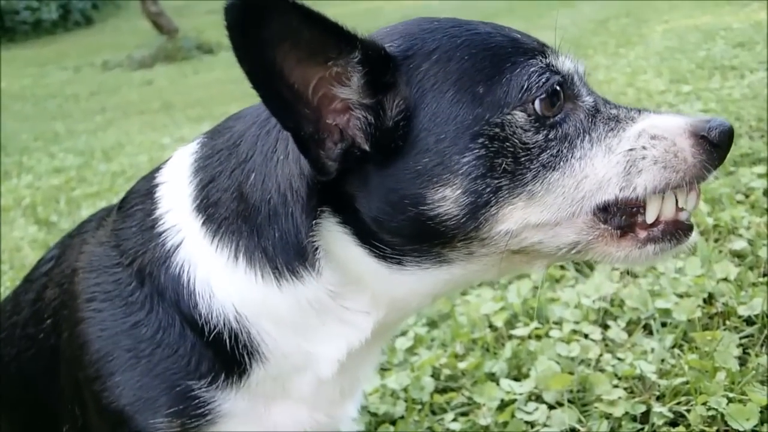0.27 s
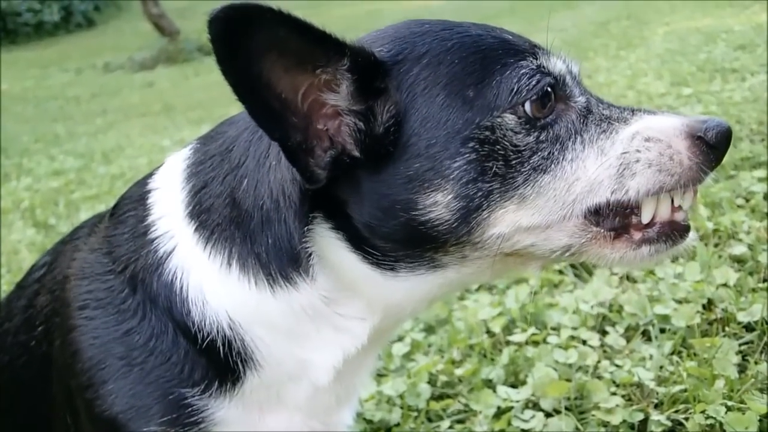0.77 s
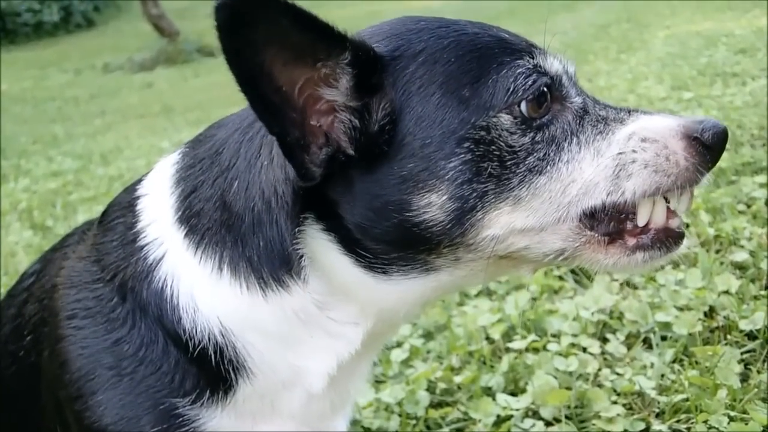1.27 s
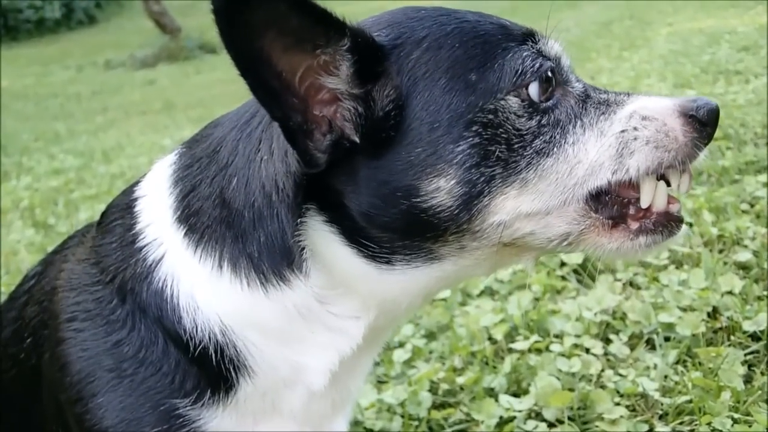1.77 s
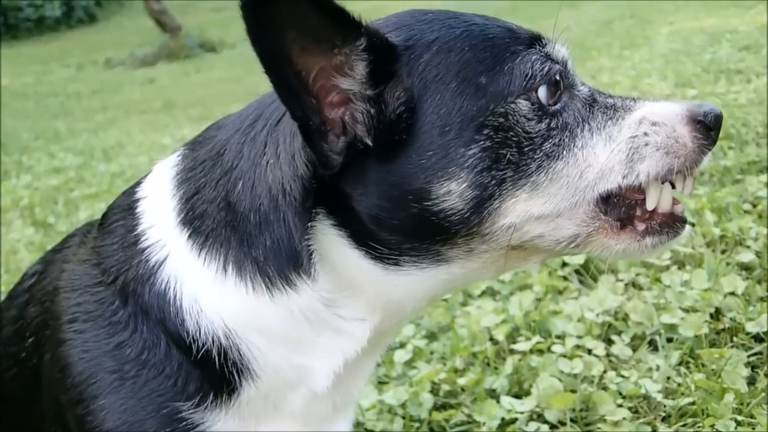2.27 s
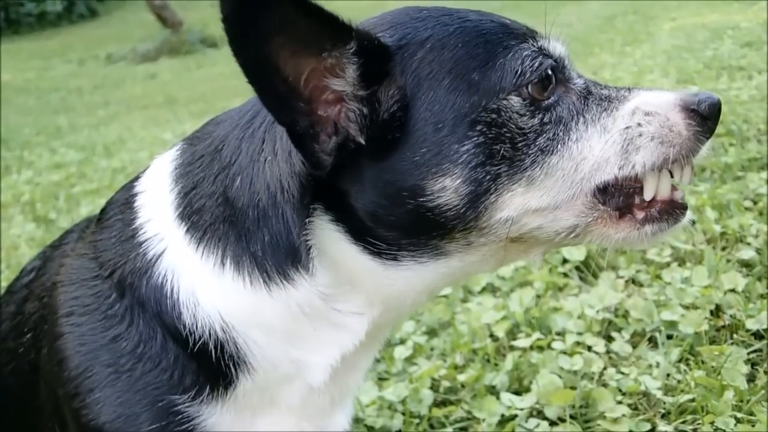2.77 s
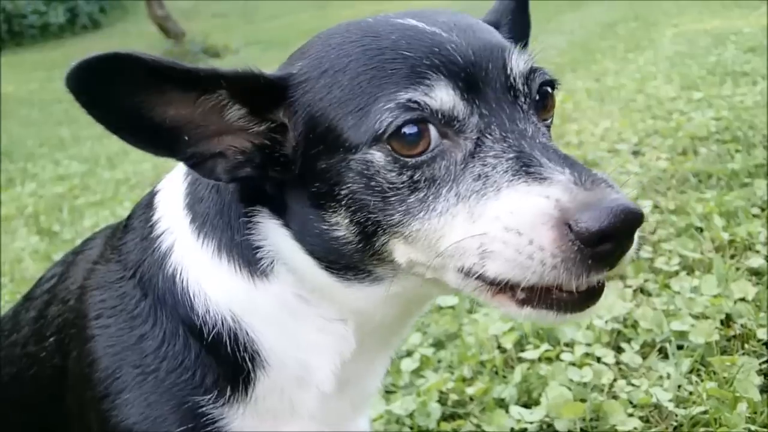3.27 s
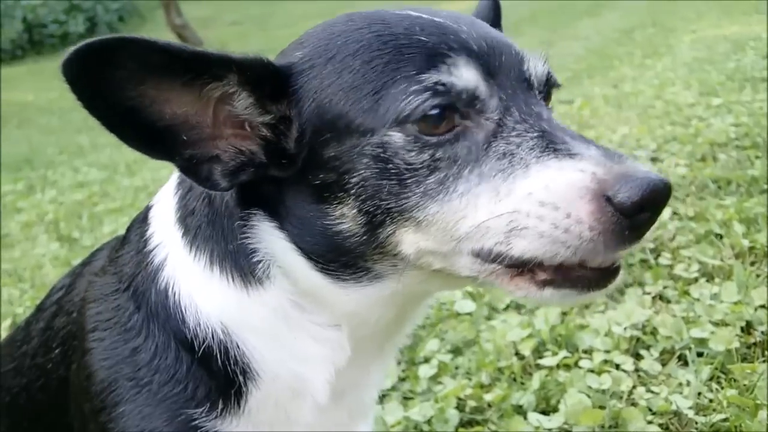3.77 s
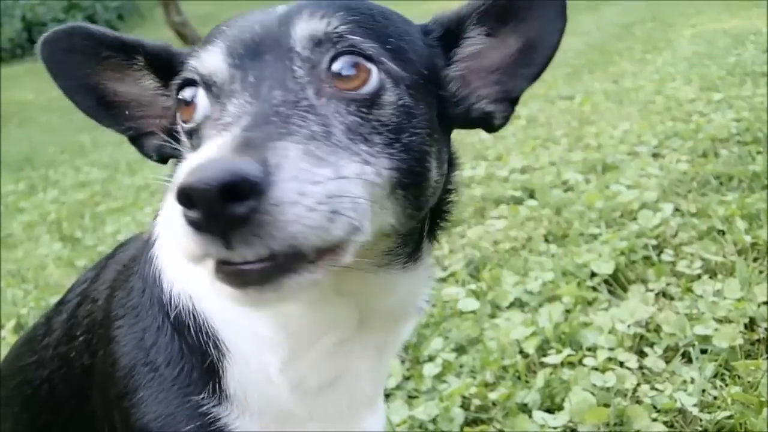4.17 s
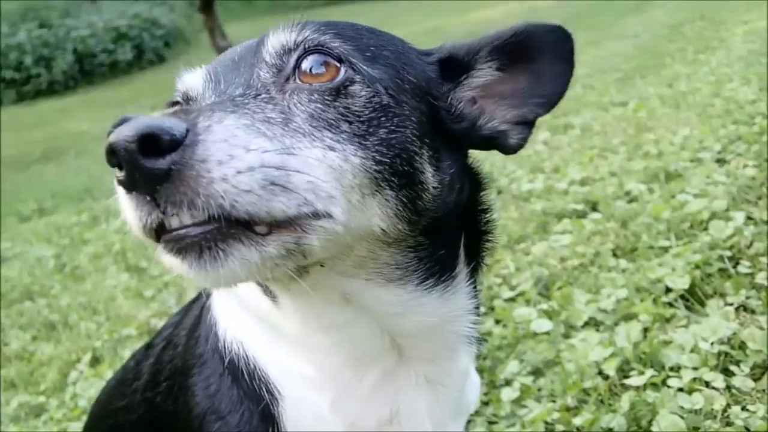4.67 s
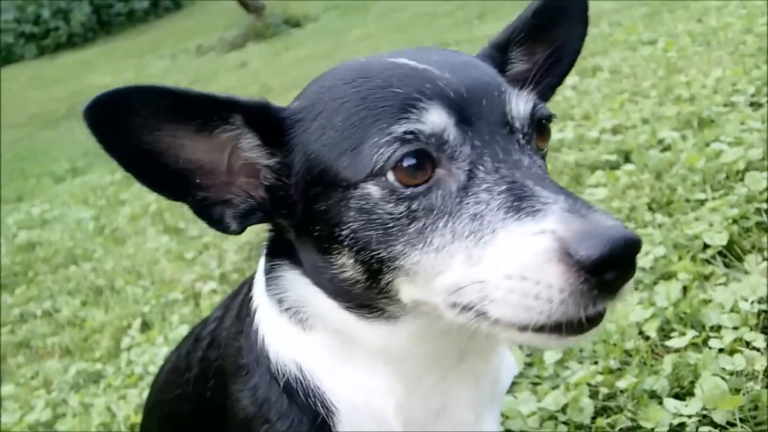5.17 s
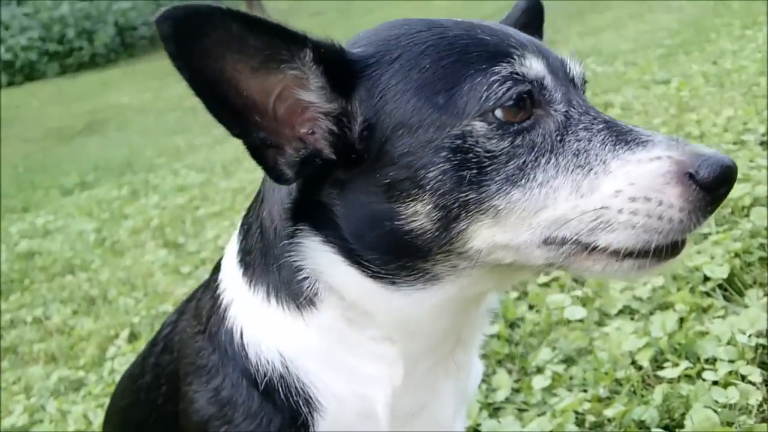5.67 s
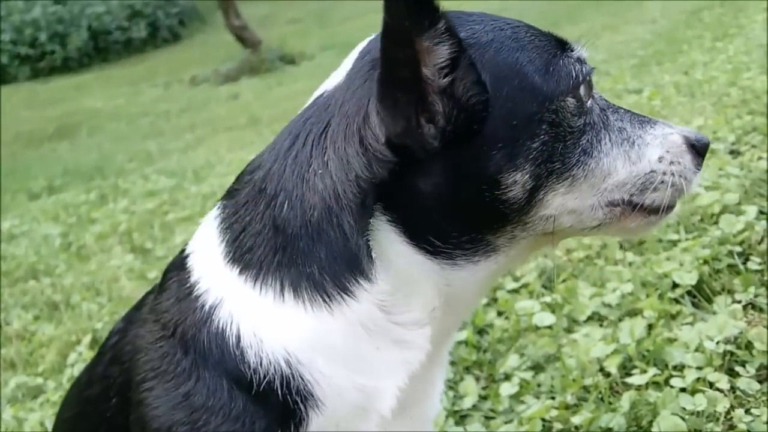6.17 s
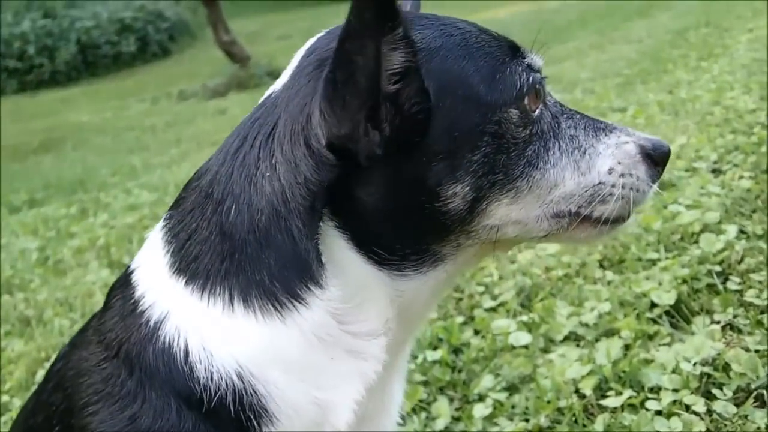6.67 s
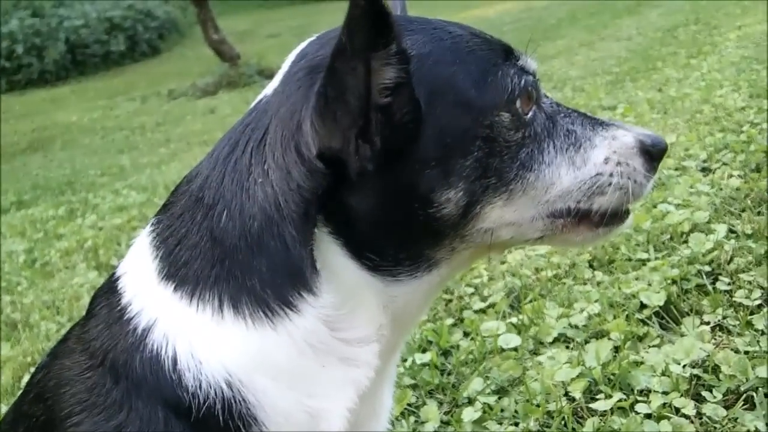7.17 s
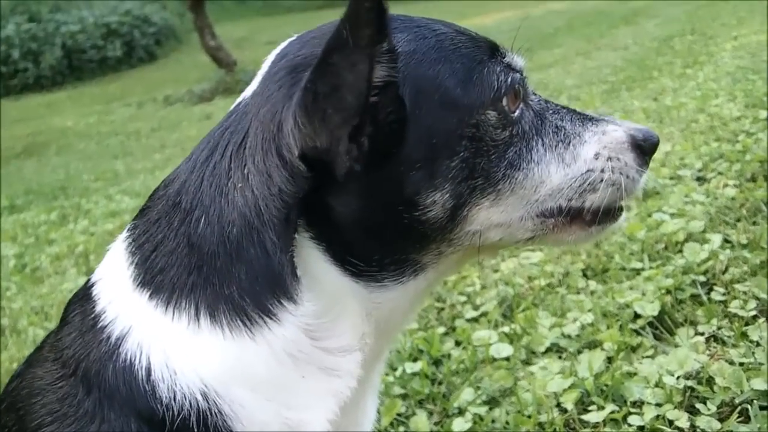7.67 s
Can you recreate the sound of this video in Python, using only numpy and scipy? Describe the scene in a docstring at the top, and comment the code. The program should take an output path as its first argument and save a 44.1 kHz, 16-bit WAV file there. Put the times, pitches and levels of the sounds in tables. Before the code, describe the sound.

A small dog snarls close by in three long, throaty growls, with wet lip clicks and faint metal jingles, while crickets chirp steadily over a lawn.

```python
"""Crickets chirp and trill over a lawn, and almost at once a small dog growls close by through bared teeth.
Two more long growls follow, the last lower with the lips nearly shut; short grunts lead into the first and third.
Slack vocal folds slap to make each growl: the slaps boom in the chest, ring the mouth and puff out rasping air.
Wet lip clicks, soft noise swells and rattling spit are shaped noise; small metal pieces jingle as bursts and modes.
Behind it all lie coloured-noise open air, a blended far chorus and a faint wavering hum."""
import sys
import numpy as np
from scipy import signal
from scipy.fft import rfft, irfft
from scipy.io import wavfile
from scipy.ndimage import uniform_filter1d

SR = 44100
rng = np.random.default_rng(int(sys.argv[2]) if len(sys.argv) > 2 else 0)


def file_out(sig):
    """Save sig as 16-bit WAV at sys.argv[1]."""
    # one column per channel
    cols = np.atleast_2d(sig).T
    # limit, then scale
    lim = np.clip(cols, -1, 1)
    pcm = np.round(lim * 32767).astype(np.int16)
    wavfile.write(sys.argv[1], SR, pcm)


N = 350154
TIME = np.arange(N) / SR

# colour of the open air: f/Hz, level/dB per Hz
LAWN = [(25, -45), (60, -5), (110, 4.5), (200, 1), (400, -3.5), (900, -7.5), (1800, -15), (3300, -16.5),
        (8500, -20), (10000, -21.5), (13000, -14.5), (16000, -27)]
# colour of the far cricket chorus: f/Hz, level/dB per Hz
CHORUS = [(3700, -19), (4300, -9.5), (4750, 4.5), (5050, -2), (5700, 2.5), (6080, -9.5), (6300, -9.5),
          (6950, -3.5), (7300, -8.5), (8000, -11), (9200, -29)]
# left-right likeness of air and chorus: f/Hz, likeness (1 alike, 0 unrelated, below 0 opposed)
SAME = [(50, 0.2), (130, 0.84), (300, 0.35), (1400, 0.2), (3100, 0.35), (4800, 0.41), (7000, 0.17),
        (10000, 0), (15000, -.3)]
# level of the cricket chorus: t/s, level/dB
CHORUS_DB = [(0, -42.5), (1.5, -45.5), (2.7, -42), (5.2, -42.5), (6.3, -44.5), (7.94, -42)]
# level of the faint hum: t/s, level/dB
HUM = [(5.4, -58.5), (5.9, -51.5), (6.6, -55.5)]
# bouts of the nearest trilling cricket: start t/s, end t/s, f/Hz, level/dB
TRILL = [(-.2, 2.18, 6880, -56.5), (2.45, 6.4, 7010, -52.5), (6.719, 8.2, 6970, -55)]
# trilling crickets farther off: f/Hz, strokes/s, level/dB, left minus right/dB
FAR_TRILLS = [(5550, 51, -60.5, -13), (6230, 38, -60.5, -13.5), (6640, 44, -63.5, -18), (4980, 80, -61, 1)]
# metal clinks: t/s, chatter length/s, peak level/dB, ring level/dB before the ring trim, scrape length/s
CLINKS = [(3.745, .003, -28.5, 10, 0.021), (3.822, .003, -23.5, -8, 0.0036), (4.164, .003, -25, 4, 0.01),
          (4.223, .031, -17, 3, .0025), (4.6, .017, -19, -9, 0.0021), (4.973, .003, -29.5, 13.5, .017),
          (5.063, .003, -23.5, -3, 0.0021), (5.155, .003, -31, 2, 0.009), (6.228, .003, -32, -1, .025),
          (6.319, .003, -28, -4, 0.0084), (6.57, .003, -30, -3, 0.042), (6.979, .003, -33, 3, .02),
          (7.703, .003, -30, 8, 0.0061), (7.74, .024, -16.5, -6, 0.0026)]
# modes of the ringing metal: f/Hz, relative level/dB, time to fall 60 dB/s
METAL = [(3210, -13, .08), (4610, -8, .05), (6280, -2, .07), (6720, -6, .06), (12250, -6, .17),
         (12440, -9, .2), (12800, -12, .1), (13720, -11, .15), (14620, -5, .08), (14750, 2, .1)]
# colour of the metal's first burst: f/Hz, level/dB
STRIKE = [(1500, -66), (2600, -10), (3200, -7.5), (4700, 12.5), (6500, 6), (8000, -3), (10500, -5),
          (12500, 8), (15000, -52), (17000, -68)]
# soft swells of noise, short ones (perhaps the dog sniffing) and long faint high hiss:
# t/s, length/s, level/dB, centre f/Hz
NOISE_SWELLS = [(2.065, 0.13, -55.5, 1480), (2.55, 0.6, -55, 11000), (3.095, 3, -53.5, 14100),
                (3.981, 0.05, -51, 2077), (4.371, 0.069, -47.5, 2230), (4.382, 0.31, -53, 780),
                (4.412, 0.28, -51.5, 2640), (4.778, 0.075, -53.5, 2000), (6.355, .05, -57, 2200)]
# wet clicks of lips and tongue: t/s, peak level/dB before the smack trim, centre f/Hz
SMACKS = [(.129, -15.5, 4600), (.135, -17, 4780), (.141, -17, 4800), (.168, -18, 4630), (.232, -27, 2960),
          (1.353, -16.5, 4860), (2.326, -26.5, 3007), (2.345, -30.5, 2900), (3.853, -13, 5260),
          (4.601, -25.5, 3500), (4.744, -17.5, 5000), (4.745, -25.5, 2500), (6.578, -22.5, 4800),
          (7.107, -32, 3160)]
# bouts of spit rattling in the throat: start t/s, end t/s, flaps/s, level/dB before trim and fade
RATTLES = [(0.282, .68, 20.9, -33), (2.791, 3.0, 21.6, -35.5)]
# the three long growls: t/s, pitch f/Hz, chest level/dB, mouth level/dB (levels before each growl's trim)
SNARL = [(0.099, 107.2, -24.5, -34.5), (0.139, 103.5, -23.5, -29), (0.243, 111.5, -25.5, -35.5),
         (0.309, 96.96, -24, -34), (0.449, 112.0, -25.5, -38.5), (0.507, 103.1, -24, -38.5),
         (0.729, 112, -28.5, -43.5), (1.257, 101.3, -29, -43), (1.551, 112.2, -26.5, -40),
         (1.623, 96.7, -28, -42), (1.685, 104.5, -28, -42), (1.955, 98.6, -28.5, -44.5)]
GROWL = [(2.696, 100.2, -28.5, -37), (2.748, 103, -27.5, -36), (2.946, 102.9, -28, -39),
         (2.986, 110, -30.5, -40.5), (3.132, 112.1, -28.5, -38.5), (3.27, 104, -30, -39.5),
         (3.592, 104.8, -32, -41), (3.738, 95.9, -32.5, -40.5), (3.885, 95.7, -32, -39.5)]
GRUMBLE = [(6.445, 76.7, -44, -69), (6.553, 82.7, -32.5, -59), (6.643, 73.24, -38, -62),
           (6.733, 83.6, -34.5, -63), (6.823, 83.2, -35, -56), (6.885, 86.54, -33, -51.5),
           (7.281, 88.85, -32, -49.5), (7.563, 85.44, -33.5, -55), (7.85, 78.6, -36, -58.5)]
# short grunts: t/s, length/s, pitch f/Hz, chest level/dB, mouth level/dB
GRUNTS = [(0.069, 0.0227, 104.8, -24.5, -29), (6.092, 0.042, 81.5, -42, -72),
          (6.142, .085, 79.2, -36.5, -62)]
# spells in which the folds lock into a clean beat: t/s, half length/s
CLEAN_SPELLS = [(1.033, 0.062), (1.432, 0.064), (3.191, 0.054), (3.69, .12), (6.578, 0.052), (7.548, .15)]
# the lips: t/s, how far drawn back (0-1)
BARED = [(.05, 0.71), (.6, 0.94), (1.05, 0.46), (2.7, 0.52), (2.82, 0.82), (3.04, 0.16), (7.9, 0.14)]
# boom of the chest with jaws open, ajar and shut: f/Hz, level/dB
CHEST_OPEN = [(50, -40), (85, -24.5), (115, -9.5), (170, -2), (220, 0.5), (290, -9.5), (365, -12),
              (430, -18), (500, -54.5), (700, -29), (1400, -53), (8000, -100)]
CHEST_AJAR = [(50, -20), (85, -22), (115, -1), (170, -1.5), (215, 5), (290, -4), (400, -10.5), (500, -10.5),
              (640, -35), (1400, -54), (8000, -100)]
CHEST_SHUT = [(50, -59), (85, -18.5), (125, -5), (175, -2), (260, -6.5), (355, -8.5), (440, -26),
              (530, -23), (650, -36.5), (1400, -61), (8000, -100)]
# ring of the mouth, before its size and the tongue shift it: f/Hz, level/dB
MOUTH = [(300, -47), (520, -24.5), (620, -12.5), (730, -8.5), (830, -2), (905, 4), (1030, -5.5),
         (1190, -6.5), (1350, -40.5), (1520, -19), (1750, -46), (3500, -40), (10000, -82)]
# rasp of air with lips down, teeth just showing, and lips wide back: f/Hz, level/dB
RASP_LIPS = [(900, -26), (1430, 6.5), (1750, 1), (2150, 15), (2550, 9.5), (2950, -1.5), (3500, -2),
             (5000, -2), (8000, -7.5), (16000, -6.5)]
RASP_TEETH = [(900, -26.5), (1520, 3), (1800, 0.5), (2100, -1), (2500, 6), (2950, -1), (3600, 5), (4400, 8),
              (4900, 14), (5500, 14), (6100, -6), (9000, -5), (10200, -38), (16000, -53)]
RASP_WIDE = [(900, -15), (1550, -41.5), (1850, 5.5), (2150, 6), (2450, -2), (2800, 11.5), (3150, 6),
             (3450, -5), (3750, 6.5), (4400, -5), (4900, 17), (5400, 9), (6100, 15), (7100, -12),
             (9400, 2.5), (10300, -26), (16000, -25)]

LAWN_DB, HUM_HZ = -48.5, 131.8
CHIRP_FIRST_S, CHIRP_EVERY_S = .275, .458  # a field cricket keeps a nearly even beat
CHIRP_DB = -36.5  # the full-height strokes, before their random unevenness
BOUNCE_S = .0068  # time between knocks while the metal pieces chatter
ATTACK_S = 0.0036  # fade at both ends of every growl and grunt
RELEASE_S, RELEASE_DB, RELEASE_SAG = 0.0785, -29.5, .26  # air runs out: level falls, pitch sags by this share
FUNDAMENTAL_HZ, FUNDAMENTAL_DB_PER_OCTAVE = 109, 36  # below this pitch the fundamental fades quickly
BUILD_DB, BUILD_S = -10, 0.21  # the fundamental starts this much weaker and builds up
PUSH_DB, PUSH_S = 2.5, 0.022  # the first slaps burst out harder
RASP_SHARE = 0.51  # dB of rasp for each dB of the mouth
FLUTTER_FROM, FLUTTER_RANGE = .27, .35  # onset and span of throat flutter, in roughness times bared lips
EDGE_HZ = 15850  # upper band limit


def amp(db):
    """Decibels to gain."""
    return 10 ** (np.asarray(db) / 20)


def evened(x):
    """Scales to rms 1."""
    return x / np.sqrt(np.mean(x ** 2) + 1e-20)


def read(points, hz):
    """Reads a spectrum on a log-frequency axis."""
    f, value = np.transpose(points)
    return np.interp(np.log(hz + 1), np.log(f + 1), value)


def follow(rows, t):
    """Reads every column of a curve at the times t."""
    s, *columns = np.transpose(rows)
    return [np.interp(t, s, c) for c in columns]


def add(mix, s, sound):
    """Mixes a sound in at time s."""
    part = mix[max(round(s * SR), 0):][:len(sound)]
    part += sound[:len(part)]


def wander(n, hz):
    """Slow random drift, moving up to about hz times a second; rms 1 over its full eight-second run."""
    count, rate = 2 ** 14, 2000
    f = np.fft.rfftfreq(count, 1 / rate)
    slow = evened(irfft(rfft(rng.standard_normal(count)) / (1 + (f / hz) ** 4)))
    return np.interp(np.arange(n) / SR, np.arange(count) / rate, slow)


def colour(x, points):
    """A causal filter with the given spectrum: each pulse rings after it lands."""
    log_gain = np.log(amp(read(points, abs(np.fft.fftfreq(4096, 1 / SR)))))
    taps = np.fft.ifft(np.exp(np.conj(signal.hilbert(log_gain)))).real  # minimum phase
    return signal.oaconvolve(x, taps[:len(taps) // 2])[:len(x)]


def band(x, hz, ratio):
    """A gentle band-pass from hz / ratio to hz * ratio."""
    ratio = max(ratio, 1.05)
    edges = [hz / ratio, min(hz * ratio, SR / 2 - 1)]
    return signal.sosfilt(signal.butter(2, edges, "band", fs=SR, output="sos"), x)


def steadied(x, size=4000):
    """Keeps the slow level near rms 1 and leaves single pulses uneven."""
    return x / np.sqrt(abs(uniform_filter1d(x ** 2, size)) + 1e-4 * np.mean(x ** 2))


def place(x, pan_db):
    """Sets a sound between left and right; pan_db is left minus right."""
    return x * amp([[pan_db / 2], [-pan_db / 2]])


def wash(spectrum, patchy_db):
    """Distant sound from all sides, in drifting patches, partly alike in both channels."""
    hz = np.fft.rfftfreq(1024, 1 / SR)
    frames = N // 256 + 5
    a, b, c, d, patches = rng.standard_normal((frames, len(hz), 5)).T
    patches = uniform_filter1d(patches, size=6, axis=0)
    patches = evened(uniform_filter1d(patches, size=5, axis=1))
    same = np.clip(read(SAME, hz), -1, 1)[:, None]
    left = a + 1j * b
    right = same * left + np.sqrt(1 - same ** 2) * (c + 1j * d)
    z = np.array([left, right]) * amp(read(spectrum, hz)[:, None] + patchy_db * patches)
    return evened(signal.istft(z, nperseg=1024, noverlap=768)[1][:, :N])


def hum():
    """A faint sine that wavers in pitch and strength."""
    pitch = HUM_HZ * (1 + .015 * wander(N, 9.6))
    tone = np.sin(2 * np.pi * np.cumsum(pitch) / SR)
    return evened(tone * amp(1.9 * wander(N, 6))) * amp(follow(HUM, TIME)[0])


def background():
    """Open air, the blended chorus of far crickets, and the hum, all leaning right."""
    air = wash(LAWN, patchy_db=3.0) * amp(LAWN_DB)
    chorus = wash(CHORUS, patchy_db=2.5) * amp(follow(CHORUS_DB, TIME)[0])
    return place(air + chorus + hum(), -4.0)


def stroke_train(hz, rate, glide=.045, duty=.62, blur=0.01293):
    """A trilling cricket's wings: every stroke is a short tone that sags in pitch."""
    phase = np.cumsum(rate * (1 + .008 * wander(N, 2))) / SR % 1 / duty
    pitch = hz * (1 + glide * (.5 - phase) + blur * wander(N, 309.4))
    stroke = np.sin(np.pi * np.minimum(phase, 1))  # silent between strokes
    tone = np.sin(2 * np.pi * np.cumsum(pitch) / SR)
    return evened(stroke * tone * amp(0.77 * wander(N, 5.8)))


def chirping_cricket(stroke_s=.024, gap_s=.043, chirp_hz=4810, sag=0.044, uneven_s=.004, count=4):
    """Wing strokes in groups: the first strokes of each chirp swell, and each stroke sags in pitch."""
    chirps, u = np.zeros(N), np.linspace(0, 1, int(stroke_s * SR))
    for s in np.arange(CHIRP_FIRST_S, N / SR, CHIRP_EVERY_S):
        start = s + uneven_s * rng.standard_normal()
        for k in range(count):
            pitch = chirp_hz * (1 + sag * (.5 - u) + 0.013 * rng.standard_normal())
            swell_db = -3 * max(2 - k, 0) + rng.standard_normal()
            stroke = np.sin(np.pi * u) * np.sin(2 * np.pi * np.cumsum(pitch) / SR)
            add(chirps, start + k * gap_s - stroke_s / 2, amp(CHIRP_DB + swell_db) * stroke)
    return chirps


def crickets(swell_s=0.15):
    """One cricket chirps in groups of strokes; others trill, the nearest in long bouts."""
    out = place(chirping_cricket(), 1)
    for start, end, hz, db in TRILL:
        bout = np.clip(np.minimum(TIME - start, end - TIME) / swell_s, 0, 1)
        out += place(stroke_train(hz, 41.4) * bout * amp(db), -2.5)
    for hz, rate, db, pan_db in FAR_TRILLS:
        out += place(stroke_train(hz, rate, blur=0.018) * amp(db), pan_db)
    return out


def metal_ring(t, detune=0.0031):
    """Thin high modes of small metal, each a little off in pitch and level, dying at its own pace."""
    modes = np.zeros(len(t))
    for hz, level, t60 in METAL:
        decay = amp(level + rng.standard_normal() - 60 * t / t60)
        turns = hz * (1 + detune * rng.standard_normal()) * t
        modes += decay * np.sin(2 * np.pi * (turns + rng.random()))
    return modes


def jingle(ring_trim_db=-14, uneven_db=1.5):
    """Metal pieces knock, chatter or slide: a burst, then a ring, unlike at each microphone port."""
    out, t = np.zeros((2, N)), np.arange(SR // 4) / SR
    for start, length, db, ring_db, scrape_s in CLINKS:
        rise = 1 - np.exp(-2 * t / scrape_s)
        for s in np.arange(start, start + length, BOUNCE_S):
            force = amp(db + uneven_db * rng.standard_normal())
            for side in out:
                scrape = rng.standard_normal(len(t)) * rise * np.exp(-t / scrape_s)
                strike = colour(scrape, STRIKE)
                ring = amp(ring_db + ring_trim_db) * rise * metal_ring(t)
                add(side, s, force * (strike / abs(strike).max() + ring))
    return place(out, -4.0)


def yard(x, t60, low_hz=700):
    """Faint scatter of the treble from leaves and things nearby, different in each channel."""
    t = np.arange(SR // 3) / SR
    echoes = rng.standard_normal((2, len(t))) * (rng.random((2, len(t))) < .05)  # sparse reflections
    taps = echoes * amp(-60 * t / t60) * (t > .003)
    taps = signal.lfilter(*signal.butter(1, low_hz, "high", fs=SR), taps / np.linalg.norm(taps[0]))
    return signal.oaconvolve(np.atleast_2d(x) * np.ones((2, 1)), taps, axes=1)[:, :N]


def noise_swells():
    """Band-passed noise rises and falls softly: short swells, and long faint high hiss."""
    out = np.zeros(N)
    for s, length, db, hz in NOISE_SWELLS:
        n = int(length * SR)
        swell = np.sin(np.linspace(0, np.pi, n))
        add(out, s, amp(db) * evened(band(rng.standard_normal(n), hz, 1.54) * swell))
    return out


def smacks(smack_s=0.0032, trim_db=-1):
    """Wet clicks of lips and tongue: a tiny noise burst with a bright band and a softer low one."""
    out, t = np.zeros(N), np.arange(SR // 30) / SR
    decay = np.exp(-t / smack_s)
    for s, db, hz in SMACKS:
        click = band(rng.standard_normal(len(t)) * decay, hz, 1.2)
        click += .5 * band(rng.standard_normal(len(t)) * decay, 630, 1.85)
        add(out, s, amp(db + trim_db) * click / abs(click).max())
    return out


def rattles(length_s=0.03, centre_hz=3100, spread=0.0575, fall=0.176, width_hz=350, trim_db=-9,
            fade_db_per_s=-20):
    """Each flap of the wet throat is a short fuzzy squelch that falls in pitch; a bout dies away."""
    out, u = np.zeros(N), np.linspace(0, 1, int(length_s * SR))
    for start, end, rate, db in RATTLES:
        for s in np.arange(start, end, 1 / rate):
            hz = centre_hz * (1 + spread * rng.standard_normal())
            tone = np.exp(2j * np.pi * np.cumsum(hz * (1 + fall * (.5 - u))) / SR)
            fuzz = wander(len(u), width_hz) + 1j * wander(len(u), width_hz)
            squelch = evened((tone * fuzz).real * np.sin(np.pi * u))
            level_db = db + trim_db + fade_db_per_s * (s - start)
            add(out, s - length_s / 3, amp(level_db) * squelch)
    return out


def roughness(t, first, last, settle_s, clean=.65):
    """A growl starts ragged and settles, with brief clean spells on the way."""
    rough = last + (first - last) / (1 + ((t - t[0]) / settle_s) ** 4)
    for s, half_s in CLEAN_SPELLS:
        rough = rough * (1 - clean * np.exp(-((t - s) / half_s) ** 2))
    return np.clip(rough, 0, 1)


def throat_flap(t, rough, lips):
    """Loose tissue in the throat flaps slowly, loosely in step with the nearest rattle of spit."""
    depth = np.clip((rough * lips - FLUTTER_FROM) / FLUTTER_RANGE, 0, 1)
    flap_s, _, flap_hz, _ = min(RATTLES, key=lambda bout: abs(bout[0] - t[0]))
    return depth * np.cos(2 * np.pi * flap_hz * (t - flap_s) + .5 * wander(len(t), 7.7))


def fold_slaps(hz, rough, flap, jitter=.19, drift=.06, shimmer_db=3, burst_db=5, flutter_db=4,
               chest_flutter_db=1.5):
    """Slack vocal folds slap unevenly: one pulse train for the chest, a harsher one for mouth and air."""
    n = len(hz)
    turns = np.cumsum(hz * (1 + drift * rough * wander(n, 25))) / SR
    beats = np.searchsorted(turns, np.arange(np.ceil(turns[-1])))
    late, strong, harsh, luck = rng.standard_normal((400, 4))[:len(beats)].T
    # most slaps keep time; now and then one slips, and lands harder
    slip = np.where(abs(luck) < rough[beats], rough[beats] ** .5, .23 * rough[beats])
    at = np.clip(beats + jitter * slip * late * SR / hz[beats], 0, n - 1).astype(int)
    slaps, snaps = np.zeros((2, n))
    slaps[at] = amp(shimmer_db * rough[at] * strong + chest_flutter_db * flap[at])
    snaps[at] = amp(burst_db * slip * np.minimum(abs(harsh), 2) + flutter_db * flap[at])
    return slaps, snaps


def air_puffs(snaps, hz, puff_turns=0.3, leak=0.21):
    """Each slap lets out a dying puff of noisy air, over a steady leak."""
    decay = np.exp(-hz.mean() / (puff_turns * SR))
    puffs = signal.lfilter([1], [1, -decay], np.sqrt(snaps)) + leak
    return evened(puffs * rng.standard_normal(len(snaps)))


def chest_boom(slaps, lips, chest_colour):
    """The slaps boom in the chest; the jaws part as the lips draw back, which opens the sound."""
    jaws = np.minimum(2 * lips, 1)
    return steadied(jaws * colour(slaps, CHEST_OPEN) + (1 - jaws) * colour(slaps, chest_colour))


def mouth_ring(drive, rough, mouth_size):
    """The tongue shifts, so the mouth rings now a little lower, now a little higher."""
    tongue = .5 + .5 * np.tanh(8.6 * rough * wander(len(drive), 7.6))
    low = colour(drive, [(f * .97 / mouth_size, db) for f, db in MOUTH])
    high = colour(drive, [(f * 1.03 / mouth_size, db) for f, db in MOUTH])
    return steadied((1 - tongue) * low + tongue * high)


def rasp(air, snaps, lips, buzz=0.47):
    """Air hisses past lips and teeth, its colour blending as the lips draw back."""
    jet = air + buzz * (1 - lips) * evened(snaps)
    hiss = np.zeros(len(jet))
    for k, shape in enumerate((RASP_LIPS, RASP_TEETH, RASP_WIDE)):
        hiss += np.maximum(1 - abs(2 * lips - k), 0) * colour(jet, shape)
    # hold the level around 2.5 kHz steady
    power = uniform_filter1d(band(hiss, 2520, 1.375) ** 2, size=5000)
    return hiss / np.sqrt(abs(power) + 1e-12)


def growl(t, hz, chest_db, mouth_db, rasp_db, fundamental_db, rough, chest_colour, mouth_size, breathy=0.99):
    """Uneven fold slaps boom in the chest, ring the mouth and let out rasping puffs of air."""
    lips = np.clip(follow(BARED, t)[0], 0, 1)
    slaps, snaps = fold_slaps(hz, rough, throat_flap(t, rough, lips))
    air = air_puffs(snaps, hz)
    boom = chest_boom(slaps, lips, chest_colour)
    lowpass = signal.butter(4, 1.6 * hz.mean(), fs=SR, output="sos")
    fundamental = steadied(signal.sosfiltfilt(lowpass, boom))
    # the fundamental swells as the pitch rises, and builds up from the start
    deep_db = fundamental_db + FUNDAMENTAL_DB_PER_OCTAVE * np.minimum(np.log2(hz / FUNDAMENTAL_HZ), 0)
    deep_db += BUILD_DB * np.exp(-((t - t[0]) / BUILD_S) ** 2)
    drive = evened(snaps) + breathy * (rough + 0.86 * lips) * air
    voice = boom * amp(chest_db)
    # top up only what the boom leaves short
    voice += fundamental * np.maximum(amp(deep_db) - amp(chest_db - 13.5), 0)
    voice += mouth_ring(drive, rough, mouth_size) * amp(mouth_db)
    voice += rasp(air, snaps, lips) * amp(rasp_db + RASP_SHARE * mouth_db)
    return voice * np.clip(np.minimum(t - t[0], t[-1] - t) / ATTACK_S, 0, 1)


def long_growl(rows, chest_colour, mouth_size, rough_first, rough_last, settle_s, chest_trim_db,
               mouth_trim_db, rasp_db, fundamental_db):
    """One long push of air, which ends in a quick sag of level and pitch."""
    t = np.arange(rows[0][0], rows[-1][0] + RELEASE_S, 1 / SR)
    hz, chest_db, mouth_db = follow(rows, t)
    spent = np.clip((t - rows[-1][0]) / RELEASE_S, 0, 1) ** 2
    rough = roughness(t, rough_first, rough_last, settle_s)
    voice = growl(t, hz * (1 - RELEASE_SAG * spent), chest_db + chest_trim_db, mouth_db + mouth_trim_db,
                  rasp_db, fundamental_db, rough, chest_colour, mouth_size)
    push_db = PUSH_DB * np.exp(-(t - t[0]) / PUSH_S)
    return t[0], voice * amp(push_db + RELEASE_DB * spent ** 2)


def grunt(s, length, hz, chest_db, mouth_db, rough=.8, fade_db=-6, rasp_db=-36, fundamental_db=-28):
    """A few ragged slaps that die away."""
    t = np.arange(s, s + length, 1 / SR)
    held = np.ones(len(t))
    voice = growl(t, hz * held, chest_db, mouth_db, rasp_db, fundamental_db, rough * held, CHEST_SHUT,
                  mouth_size=0.97)
    return s, voice * amp(fade_db * ((t - s) / length) ** 2)


def small_dog():
    """Smacks, rattling spit, three long growls and the short grunts, with the soft noise swells."""
    dog = smacks() + noise_swells() + rattles()
    add(dog, *long_growl(SNARL, CHEST_OPEN, mouth_size=1.0, rough_first=.83, rough_last=.46, settle_s=.8,
                         chest_trim_db=-2.0, mouth_trim_db=1.5, rasp_db=-29, fundamental_db=-34.5))
    add(dog, *long_growl(GROWL, CHEST_AJAR, mouth_size=1.045, rough_first=.9, rough_last=.32, settle_s=.36,
                         chest_trim_db=-0.5, mouth_trim_db=0.5, rasp_db=-27.5, fundamental_db=-32.0))
    add(dog, *long_growl(GRUMBLE, CHEST_SHUT, mouth_size=.96, rough_first=.45, rough_last=.12, settle_s=.95,
                         chest_trim_db=0.0, mouth_trim_db=-1.0, rasp_db=-38, fundamental_db=-37))
    for row in GRUNTS:
        add(dog, *grunt(*row))
    return dog


def scene():
    """The dog close by and to the right, with the crickets around it."""
    dog = small_dog()
    ports = np.array([np.roll(dog, shift=1), dog])  # the right port hears the dog one sample first
    dog_scatter = amp(-9.5) * yard(dog, t60=.15)
    insects = crickets()
    insects = insects + amp(-6) * yard(insects, t60=.14)
    return place(ports + dog_scatter, -4.5) + insects + jingle() + background()


def record(dry, notch_hz=4030, notch_width_hz=260):
    """The microphone has a narrow, deep notch in the treble; then the band limit."""
    notch = signal.iirnotch(notch_hz, notch_hz / notch_width_hz, SR)
    notched = signal.lfilter(*notch, signal.lfilter(*notch, dry))  # twice
    lowpass = signal.firwin(511, EDGE_HZ, window=("kaiser", 9), fs=SR)
    return signal.oaconvolve(notched, lowpass[None], "same")


dry = scene()
out = record(dry)
file_out(out)
```